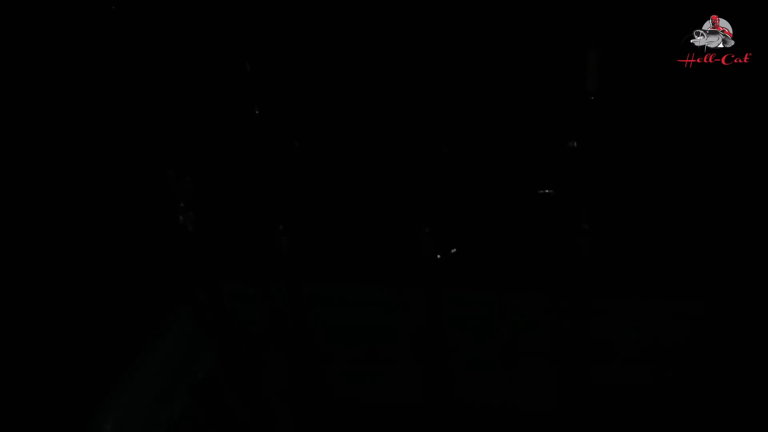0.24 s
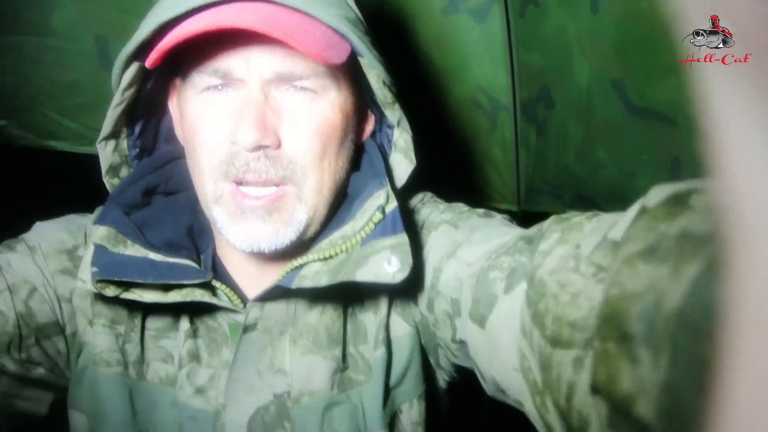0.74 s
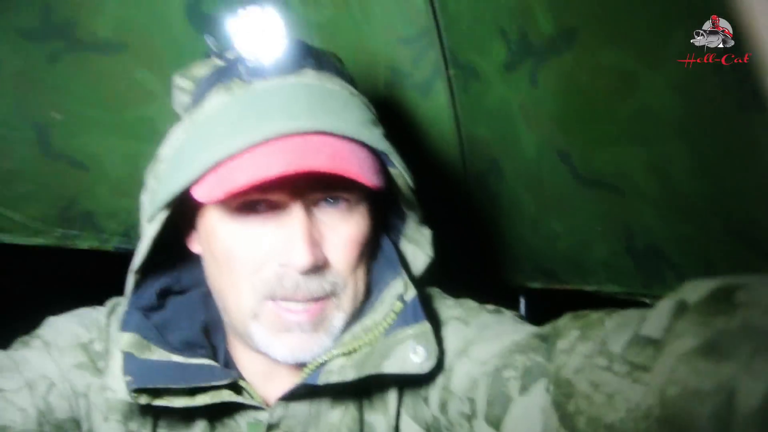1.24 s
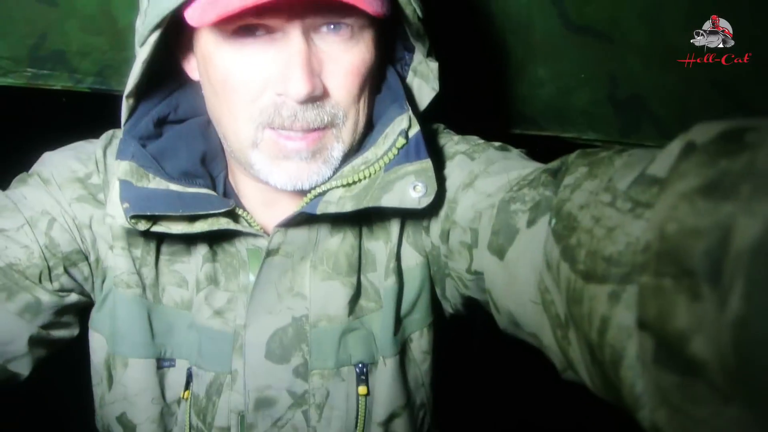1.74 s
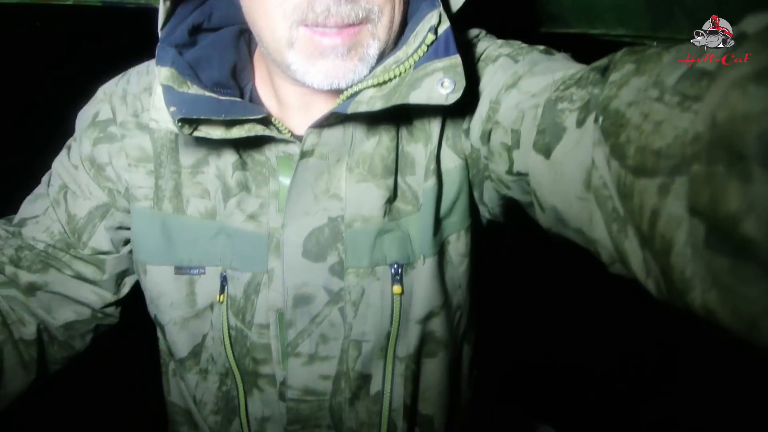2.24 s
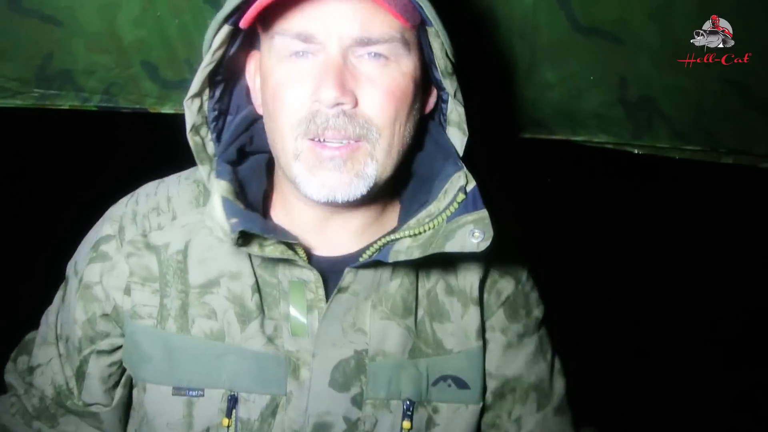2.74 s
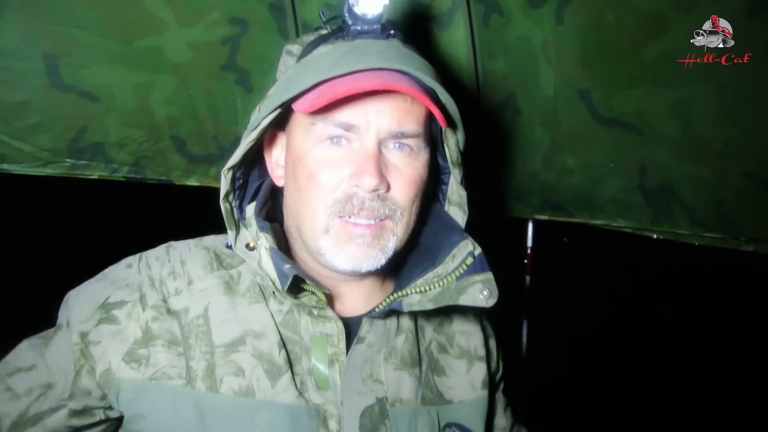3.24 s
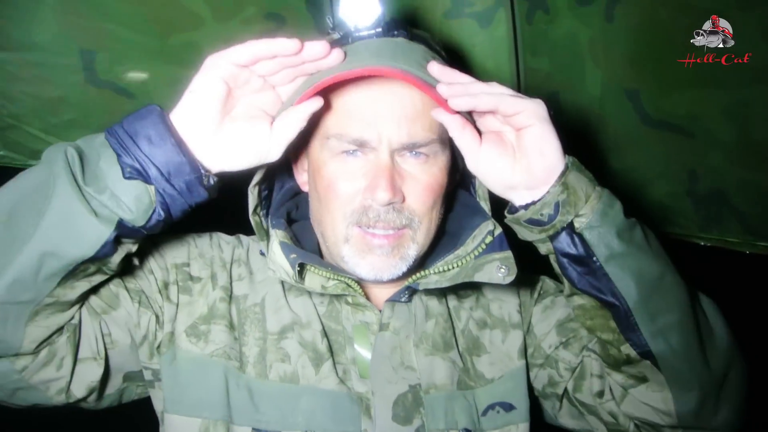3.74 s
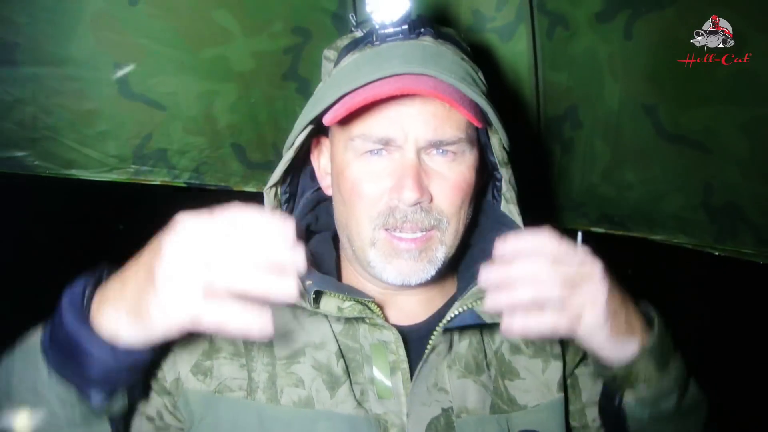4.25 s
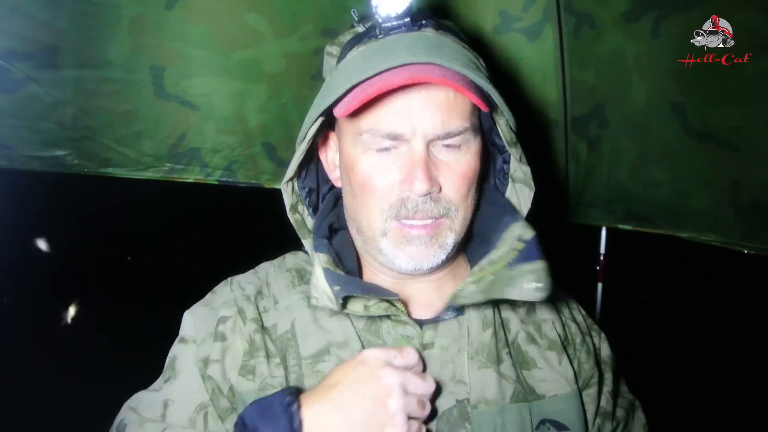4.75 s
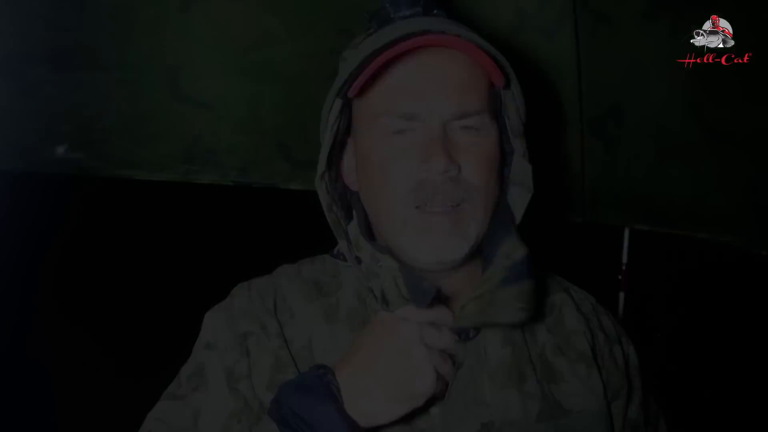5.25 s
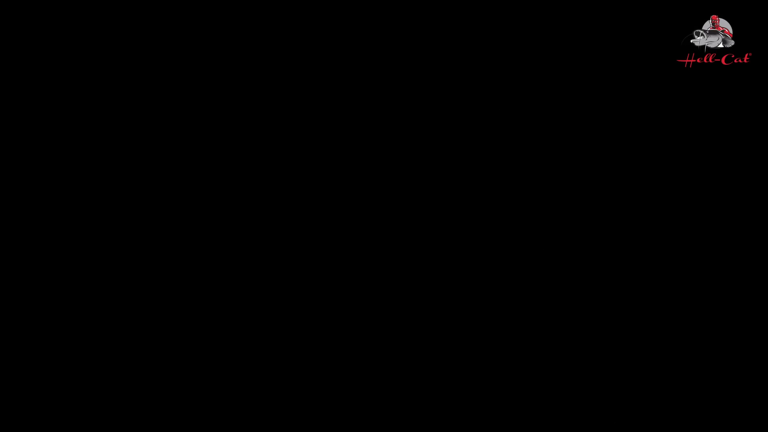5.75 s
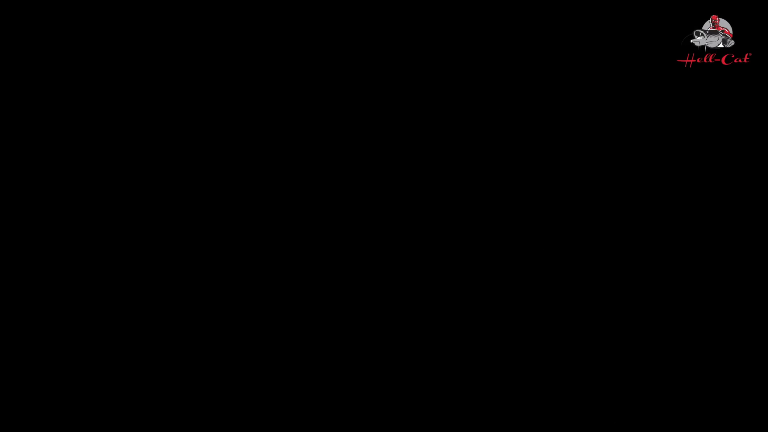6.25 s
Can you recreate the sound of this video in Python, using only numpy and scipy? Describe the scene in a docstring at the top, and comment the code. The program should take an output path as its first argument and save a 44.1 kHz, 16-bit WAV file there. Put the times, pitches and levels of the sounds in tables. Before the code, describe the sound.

Heard from just beneath a tight fabric roof outdoors, rain fades in over two seconds. Small drops merge into a dense patter, while large ones land close overhead with sharp, short, slightly hollow slaps and bursts of spray. Rain hisses softly on the ground around. The shower stays steady, then fades out over about a second, leaving an almost inaudible outdoor hush with two tiny soft taps.

```python
"""Steady rain on a taut tarp roof, heard from just beneath it.
The rain fades in: small drops tap all over the cloth and merge into a patter, and rain hisses on the ground around.
Heavy drops soon fall right overhead, each a sharp slap, a short damped swing of the cloth and a burst of spray.
One stretch of the shower is looped, so its drops come round three times.
The rain fades out, and a faint outdoor hush rises at the end with two soft taps."""
import sys
import numpy as np
from scipy import signal
from scipy.fft import rfft, irfft
from scipy.io import wavfile
from scipy.ndimage import uniform_filter1d

SR = 44100
rng = np.random.default_rng(int(sys.argv[2]) if len(sys.argv) > 2 else 0)


def store_wav(level_fs):
    """Save 16-bit WAV to argv[1]."""
    pcm = np.round(np.clip(np.atleast_2d(level_fs), -1, 1) * 32767)
    wavfile.write(sys.argv[1], SR, pcm.T.astype(np.int16))


N = 286561  # length in samples


def gain_of(db):
    """Turns decibels into an amplitude factor."""
    return 10 ** (np.asarray(db) / 20)


def evened(x):
    """Scales a sound to an rms of 1, over all its channels together."""
    return x / np.sqrt(np.mean(x ** 2) + 1e-20)


def read_spectrum(points, hz):
    """Reads a spectrum table in dB, with straight lines between points on a log-frequency axis."""
    table_hz, table_db = np.transpose(points)
    return np.interp(np.log(hz + 1), np.log(table_hz + 1), table_db)


def follow(points):
    """Turns a curve of dB over time into a gain for every sample."""
    times, levels_db = np.transpose(points)
    return gain_of(np.interp(np.arange(N) / SR, times, levels_db))


def add(mix, start_s, sound):
    """Mixes a two-channel sound in at the given time, cutting it off at the end of the mix."""
    start = max(round(start_s * SR), 0)
    part = mix[:, start:][:, :sound.shape[1]]
    part += sound[:, :part.shape[1]]


def colour(x, points, size=2048):
    """Gives a sound the table's spectrum; the filter is causal, so that attacks stay sharp."""
    hz = abs(np.fft.fftfreq(size, 1 / SR))
    log_gain = np.log(gain_of(read_spectrum(points, hz)))
    # the Hilbert transform finds the phase that puts the energy as early as possible
    response = np.exp(np.conj(signal.hilbert(log_gain)))
    taps = np.fft.ifft(response).real[:size // 2]
    return signal.oaconvolve(x, taps[None], axes=1)[:, :N]


def impacts(per_s, spread_db, limit):
    """Clicks at random moments: many small, few large, none above the limit."""
    size = gain_of(spread_db * np.minimum(rng.exponential(1, N), limit))
    happens = rng.random(N) < per_s / SR
    return size * happens


def drop(hz, contact_ms, damping, size=512):
    """A brief push on the cloth radiates its acceleration: a spike, a rebound, a dying swing."""
    t = np.arange(1, size + 1) / SR
    u = t / (contact_ms / 1000)
    push = u * np.exp(-u)
    # the cloth acts as a mass on a spring; s is frequency relative to its ring
    s = 1j * np.fft.rfftfreq(2 * size, 1 / SR) / hz
    acceleration = s ** 2 / (s ** 2 + 2 * damping * s + 1)
    wave = -irfft(rfft(push, 2 * size) * acceleration)[:size]
    first_3_ms = wave[:round(.003 * SR)]
    return wave / np.sqrt(np.mean(first_3_ms ** 2))


def sheltered(wave, echo_db=-9, t60=0.034, apart=0.11, count=40, size=2600):
    """One spot on the roof as both microphones hear it, with its own weak reflections from ground and cloth."""
    echoes = np.zeros((3, size))  # one pattern shared by both sides, then one for each side
    for row in echoes:
        at = rng.integers(size // count, size, count)
        row[at] = rng.choice([-1, 1], count) * gain_of(-60 * at / SR / t60)  # falls 60 dB in t60 seconds
        row /= np.linalg.norm(row)
    shared, separate = echoes[:1], echoes[1:]
    paths = gain_of(echo_db) * (np.sqrt(1 - apart) * shared + np.sqrt(apart) * separate)
    paths[:, 0] = 1  # the direct path
    return signal.fftconvolve(wave[None], paths, axes=1)


# How hard the shower beats on the roof; the ground rain follows it weakly.
# Each row: time in seconds (before looping), change of level in dB.
SHOWER_STRENGTH = [(0, -1.5), (.35, 3), (.55, 2), (.81, 2), (.91, -1.5), (1.03, 1), (1.14, -0.5),
                   (1.26, 0.5), (1.6, 1), (1.68, -3), (1.82, 4), (1.98, -1), (2.11, 0), (2.2, -0.5),
                   (2.31, 1), (2.4, 1), (2.49, -1.5), (2.6, 1)]


def patter(level_db=-23.5, per_s=1500, spread_db=4.5, clump_db=1.88, ring_hz=960, ring_spread=0.76,
           contact_ms=0.031, damping=0.26, width_ms=0.089, count=40, size=700):
    """Smaller drops fall in clumps all over the roof; each patch has its own tension and path to the microphones."""
    out = np.zeros((2, N))
    # smoothed noise makes the hits swell and thin out together
    clumps = gain_of(clump_db * evened(uniform_filter1d(rng.standard_normal(N), size)))
    for tension in np.linspace(-1, 1, count):  # from the slackest patch to the tightest
        a, b = rng.standard_normal(2)
        patch_hz = ring_hz * np.exp(ring_spread * tension)
        tap = drop(patch_hz, contact_ms * np.exp(0.48 * a), damping * np.exp(0.16 * b))
        hits = clumps * impacts(per_s / count, spread_db, limit=2.7)
        left, right = signal.oaconvolve(hits[None], sheltered(tap), axes=1)[:, :N]
        lag = round(rng.uniform(-1, 1) * width_ms * SR / 1000)  # left is early or late by some samples
        out += [np.roll(left, lag), right]
    return gain_of(level_db) * evened(out) * follow(SHOWER_STRENGTH)


# The tone of the rain on the ground around.
# Each row: frequency in Hz, relative strength in dB per Hz.
GROUND_SPECTRUM = [(25, -11.5), (60, -8.5), (130, -1.5), (400, -2), (1000, 1), (2200, 2), (3500, 0.5),
                   (6000, -2.5), (8500, -1.5), (12000, -4), (16000, -10.5)]
# How that rain leans to one side.
# Each row: frequency in Hz, left minus right in dB.
GROUND_LEAN = [(60, 9.5), (200, -5), (700, -6), (2400, -7.5), (4400, 0), (8000, -1.5), (15000, 2.5)]


def ground_rain(level_db=-27.5, splash_db=-2, per_s=2200, spread_db=3.0, sway=0.23):
    """A smooth far hiss and the fine ticks of nearer splashes, unrelated from side to side."""
    far = evened(rng.standard_normal((2, N)))
    ticks = np.array([impacts(per_s, spread_db, limit=3.54) * rng.choice([-1, 1], N) for _ in range(2)])
    hiss = colour(far + gain_of(splash_db) * evened(ticks), GROUND_SPECTRUM)
    lean_db = read_spectrum(GROUND_LEAN, np.fft.rfftfreq(N, 1 / SR))
    hiss = irfft(rfft(hiss) * gain_of([lean_db / 2, -lean_db / 2]), N)
    return gain_of(level_db) * evened(hiss) * follow(SHOWER_STRENGTH) ** sway


# Heavy drops right overhead, as they first fall, before the shifts set in heavy_drops and the roof's colour.
# Each row: start in seconds, level in dB over the first 3 ms, ring of the unloaded cloth in Hz,
# splash in dB against that level.
OVERHEAD_DROPS = [(0.23, -14, 1150, -4), (0.247, -17, 1150, -11), (0.323, -16, 1510, -17.5),
                  (0.339, -17.5, 1050, -5.5), (0.453, -13.5, 920, -19.5), (0.548, -17, 1200, -8),
                  (0.639, -18.5, 850, -11), (0.798, -17.5, 1100, -5), (0.87, -11, 940, -17.5),
                  (0.936, -18.5, 920, -8.5), (1.01, -16, 952, -0.5), (1.058, -17.5, 1180, -8),
                  (1.198, -18, 1200, -9), (1.256, -18, 1650, -27), (1.299, -17.5, 870, -14.5),
                  (1.377, -18, 1080, -4.5), (1.4265, -17, 900, -12), (1.468, -20, 1200, -30),
                  (1.496, -19.5, 810, -11), (1.5603, -12.5, 670, -9.5), (1.6255, -18, 790, -4.5),
                  (1.748, -14.5, 975, -11.5), (1.788, -23.5, 680, -7), (1.824, -19, 1004, -13.5),
                  (1.949, -15.5, 1614, -12), (1.9911, -20, 1350, -16), (1.9966, -18.5, 1180, -7),
                  (2.0688, -18, 1050, -24), (2.0759, -21, 740, -11), (2.086, -19.5, 1100, -21.5),
                  (2.098, -21, 1000, -23.5), (2.225, -17.5, 1320, -11.5), (2.28, -19, 1150, -17.5),
                  (2.294, -16.5, 1250, -13), (2.306, -17, 1100, -5), (2.33, -22.5, 480, -17),
                  (2.352, -19.5, 870, -18.5), (2.402, -22, 1100, -8.5), (2.421, -17.5, 880, -7.5),
                  (2.505, -18, 1250, -21), (2.591, -16, 830, -10), (2.649, -20.5, 1350, -16.5)]


def heavy_drops(level_db=1.5, contact_ms=0.041, harden=0.29, damping=0.33, sag=0.83, splash_db=3.5,
                splash_s=0.00097, spray_hz=2500, size=512):
    """Large drops overhead: the cloth swings, a little lower for the load, while the water bursts into spray."""
    out, t = np.zeros((2, N)), np.arange(size) / SR
    thin = signal.butter(2, spray_hz, "high", fs=SR)  # spray has no body
    usual_db = np.mean(OVERHEAD_DROPS, axis=0)[-1]
    for start_s, db, hz, spray_db in OVERHEAD_DROPS:
        # the more spray, the harder the blow and the shorter the contact
        contact = contact_ms * gain_of(harden * (usual_db - spray_db))
        slap = drop(hz * sag, contact, damping)
        burst = 2 * np.exp(-t / splash_s) * rng.standard_normal(size)
        spray = signal.lfilter(*thin, burst)
        hit = slap + gain_of(spray_db + splash_db) * spray
        add(out, start_s, gain_of(db + level_db) * sheltered(hit, echo_db=-4.5))
    return out


# The colour that the roof gives to every drop on it.
# Each row: frequency in Hz, gain in dB.
CLOTH_COLOUR = [(30, -4.5), (100, 9.5), (160, 7.5), (240, 10), (330, 6.5), (480, 1.64), (760, 2.5),
                (1300, 0.4), (2600, -1.3), (3400, -3.5), (4300, -1.5), (8000, -5), (11000, -8),
                (16000, -9.5)]
# The left microphone faces away from the cloth and gets less of its body.
# Each row: frequency in Hz, gain in dB against the right.
LEFT_SHADE_COLOUR = [(60, -7), (200, 1.5), (400, -5.5), (1300, -5.5), (2400, -5.5), (4400, -3.5),
                     (8000, 4.5), (15000, 3.5)]


def roof():
    """All drops on the cloth take its colour; the left side is shaded and a little farther away."""
    both = colour(patter() + heavy_drops(), CLOTH_COLOUR)
    left = np.roll(colour(both[:1], LEFT_SHADE_COLOUR), 1, axis=1)  # one sample later
    return np.vstack([left, both[1:]])


# The fader opens from a depth, quickly at first, and closes along a quarter sine.
FADE_DEPTH_DB, FADE_IN_S = -43, 2.205
FADE_OUT_S, SILENT_AT_S = 1.05, 6.026  # length of the closing, and the moment it is complete


def fader():
    """Gain of the slow fade-in and the quicker fade-out."""
    t = np.arange(N) / SR
    opening = gain_of(FADE_DEPTH_DB * np.maximum(1 - t / FADE_IN_S, 0) ** 2)
    closing = np.sin(np.pi / 2 * np.clip((SILENT_AT_S - t) / FADE_OUT_S, 0, 1))
    return opening * closing


# The loop jumps back to the same moment of the shower at each splice, in seconds.
LOOP_START_S, SPLICES_S = .888, [2.69, 4.3582]


def looped(x):
    """Plays the shower from its beginning and returns to the loop start at every splice."""
    at = np.arange(N)  # which sample of the shower to play at each moment
    for splice_s in SPLICES_S:
        splice = round(splice_s * SR)
        at[splice:] = round(LOOP_START_S * SR) + np.arange(N - splice)
    return x[:, at]


# The tone of the closing hush.
# Each row: frequency in Hz, relative strength in dB per Hz.
HUSH_SPECTRUM = [(30, -7.5), (100, 3), (250, 4), (500, -2.5), (1200, -8.5), (3000, -14.5), (8000, -19),
                 (14000, -23)]
# How the hush rises.
# Each row: time in seconds, level in dB.
HUSH_LEVEL = [(6.1, -110), (6.22, -82), (6.35, -72), (6.5, -62.5)]
# Soft taps as the hush begins.
# Each row: start in seconds, level in dB over the first 3 ms before reflections, ring in Hz.
SOFT_TAPS = [(6.137, -82, 330), (6.21, -74, 520)]


def hush():
    """Faint, dull outdoor air, made of filtered noise, with two soft taps."""
    out = evened(colour(rng.standard_normal((2, N)), HUSH_SPECTRUM)) * follow(HUSH_LEVEL)
    for start_s, db, hz in SOFT_TAPS:
        add(out, start_s, gain_of(db) * sheltered(drop(hz, contact_ms=.3, damping=.2)))
    return out


def scene():
    """Roof and ground, looped and under one fader, then the hush."""
    shower = roof() + ground_rain()
    return looped(shower) * fader() + hush()


def record(dry, ceiling=0.88):
    """Rounds off the tallest spikes, then removes the treble above 15900 Hz."""
    rounded = ceiling * np.tanh(dry / ceiling)
    low_pass = signal.firwin(511, 15900, window=("kaiser", 9), fs=SR)
    return signal.oaconvolve(rounded, low_pass[None], "same")


dry = scene()
out = record(dry)
store_wav(out)
```